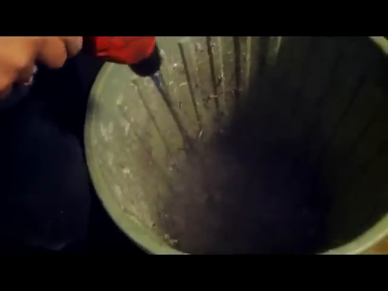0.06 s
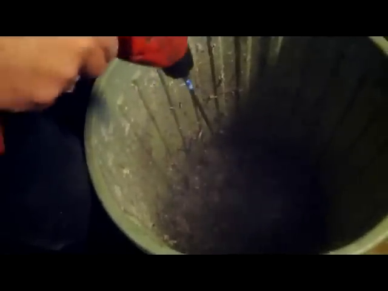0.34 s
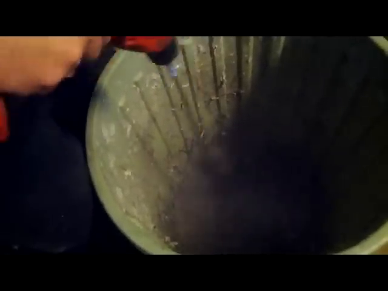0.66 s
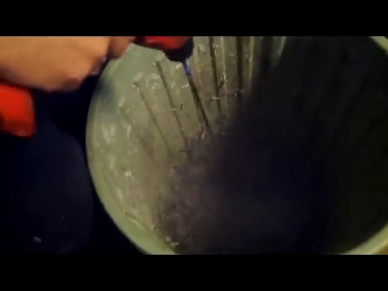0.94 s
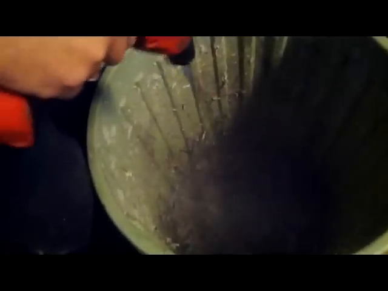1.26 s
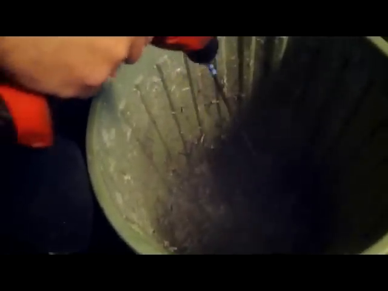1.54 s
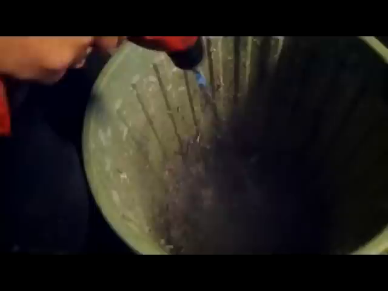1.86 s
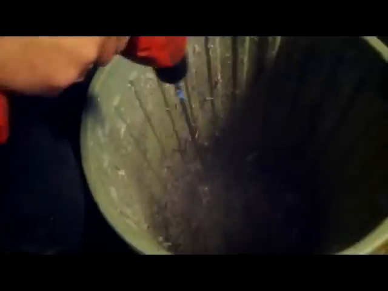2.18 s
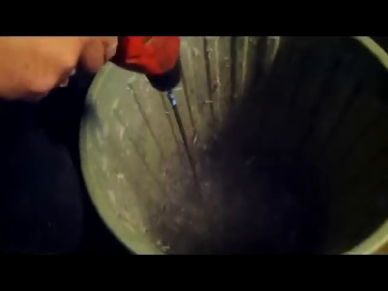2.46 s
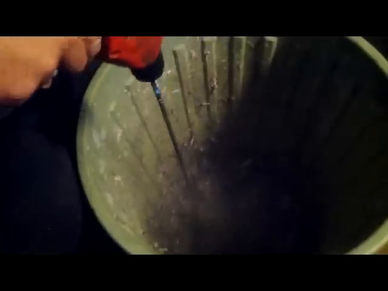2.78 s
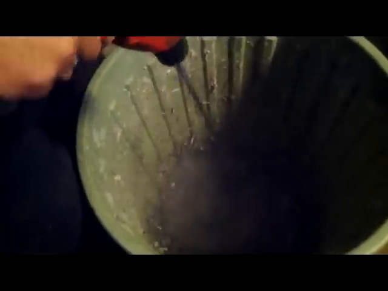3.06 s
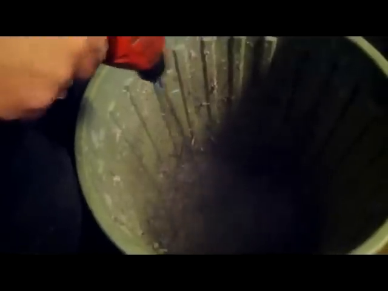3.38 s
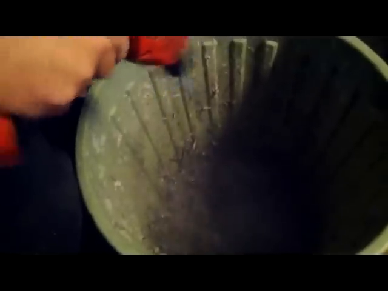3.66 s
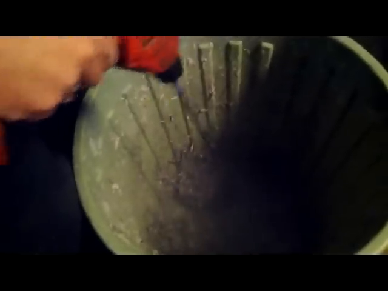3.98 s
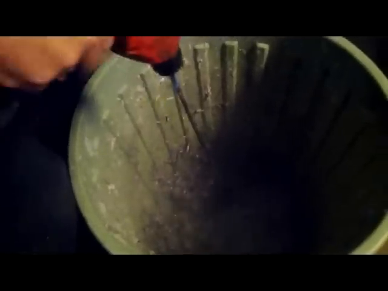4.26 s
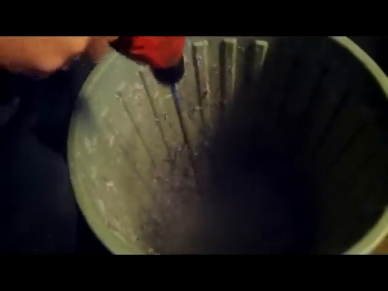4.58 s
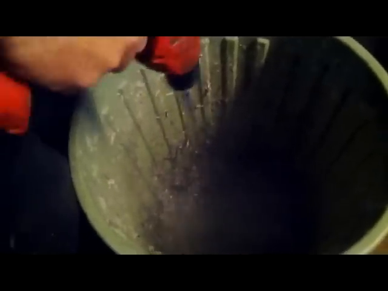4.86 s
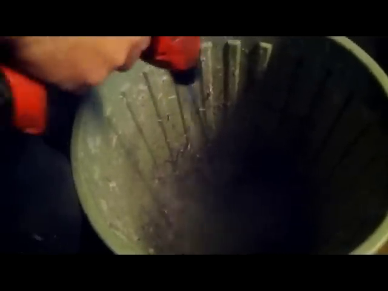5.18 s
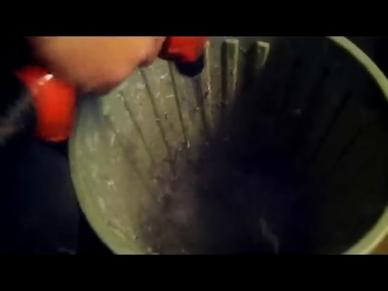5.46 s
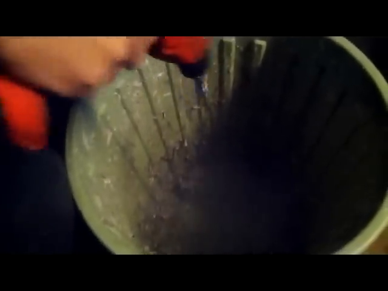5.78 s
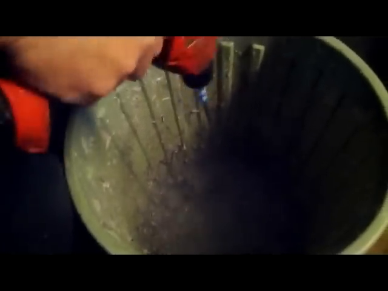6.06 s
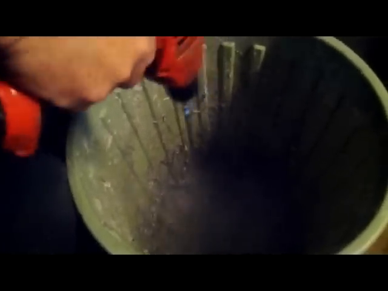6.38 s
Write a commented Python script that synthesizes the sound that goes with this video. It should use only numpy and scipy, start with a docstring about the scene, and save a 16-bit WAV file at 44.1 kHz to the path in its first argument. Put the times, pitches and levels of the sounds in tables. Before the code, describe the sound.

An electric drill stirs wet paper pulp in a plastic bucket, running in about eight uneven bursts. Its gears whine and rattle with a bright hiss, the pitch climbing, sagging and winding down at each release. The metal stirrer knocks and scrapes hollowly against the bucket while the pulp spatters and softly churns. A faint electrical hum fills the garage in the pauses. The close microphone overloads slightly.

```python
"""In a garage, an electric drill runs in bursts to stir wet paper pulp in a plastic bucket.
Its gears whine at the rate their teeth meet; tooth impacts and brush hiss ring the metal parts.
The stirrer knocks and scrapes along the bucket, exciting its modes, while the pulp spatters and churns.
Mains hum fills the pauses, and the loud bursts overload a nearby microphone."""
import sys
import numpy as np
from scipy import signal
from scipy.fft import rfft, irfft
from scipy.io import wavfile
from scipy.ndimage import uniform_filter1d

SR = 44100
rng = np.random.default_rng(int(sys.argv[2]) if len(sys.argv) > 2 else 0)


def persist_wave(psi):
    """Save psi, clipped to +-1, as 16-bit WAV."""
    counts = np.round(np.clip(psi, -1, 1) * 32767).astype(np.int16)
    wavfile.write(sys.argv[1], SR, np.atleast_2d(counts).T)


N = 292383
TIME = np.arange(N) / SR
PINION_TEETH, TEETH_PER_CHUCK_TURN, MAINS_HZ = 6, 48, 60

# One speed curve per trigger pull, from press to release. Each point: time in seconds, mesh rate in Hz.
TRIGGER_PULLS = [
    [(0.0, 1230), (0.035, 1504), (0.16, 1350), (0.235, 990)],
    [(0.5, 219.8), (0.557, 1007), (0.596, 1411), (0.65, 1711), (0.74, 1831), (0.776, 1535)],
    [(1.0, 298.3), (1.08, 1335), (1.11, 1307), (1.155, 990), (1.265, 796), (1.505, 576.2), (1.795, 1152),
     (1.863, 1258), (1.895, 1081)],
    [(2.12, 249.5), (2.225, 1528), (2.32, 1940), (2.435, 1378), (2.525, 861), (2.62, 1236), (2.668, 1054)],
    [(2.868, 298.9), (2.92, 1236), (2.96, 1502), (3.105, 1904), (3.245, 1522), (3.45, 906), (3.485, 1329),
     (3.545, 1529), (3.615, 1511), (3.745, 1717), (3.772, 1508)],
    [(4.315, 200), (4.45, 1054), (4.485, 1452), (4.58, 1959), (4.66, 1959), (4.74, 2149), (4.805, 1483),
     (4.885, 1257), (5.035, 1891), (5.12, 1953), (5.195, 1520), (5.325, 1376), (5.415, 850), (5.51, 630)],
    [(5.662, 279.5), (5.755, 1007), (5.87, 1056), (5.935, 623), (6.0, 847.6), (6.125, 876.7), (6.21, 1562),
     (6.279, 1424), (6.345, 952), (6.43, 574)],
    [(6.465, 597), (6.505, 994), (6.565, 1370), (6.63, 1349)],
]
# Spectrum of the brush hiss and the fine patter. Each row: frequency in Hz, relative level in dB.
HISS_SPECTRUM = [(3000, -19.5), (4800, -2), (5600, -2.5), (6700, -1), (8100, 2), (8700, 3), (9200, 4),
                 (9900, 0.5), (11300, 1), (13000, -1.5), (15800, -4.5)]


def drill(engage_hz=900, clean_drag=0.013, fan_lag_s=0.0097, clatter_s=0.018, coast_db_per_s=47):
    """Machine noise grows with speed; drag from the pulp modulates the frequency of the gear tones."""
    # Drag on the stirrer. Each row: time in seconds, speed wobble as a share of the speed.
    drag_curve = [(0, 0.013), (.2, .028), (.6, .01), (1.1, .012), (1.22, 0.031), (1.65, .032), (2.2, .007),
                  (2.45, .007), (3.0, .014), (3.6, .022), (3.78, 0.011), (4.38, 0.047), (4.56, .022),
                  (4.9, .015), (5.35, .024), (6.05, .04), (6.4, .027), (6.55, 0.0095)]
    # Slow drift of the treble. Each row: time in seconds, gain in dB.
    treble_drift = [(0, 1.5), (.55, -.5), (1.11, 2.5), (1.21, -4), (1.68, -1.5), (1.84, 1.5), (2.16, -0.5),
                    (2.53, -1.5), (2.64, -1), (3.3, 1.3), (3.75, 0.5), (4.4, 2.5), (4.7, 0.2), (5.4, 1.8),
                    (5.8, 2.5), (6.2, 0), (6.63, 2)]
    mesh_hz, coasting_s, mesh_db, octave_db, grip_db = motor()
    treble_db = np.interp(TIME, *np.transpose(treble_drift))
    drag = np.interp(TIME, *np.transpose(drag_curve))
    load = np.log2(drag / clean_drag)
    surge = np.tanh(np.gradient(np.log2(mesh_hz)) * SR / 13)  # saturates past 13 octaves a second
    # At each restart the gears clatter as they take up their play.
    clatter = sum(np.exp(-((TIME - pull[0][0]) / clatter_s - 1.5) ** 2) for pull in TRIGGER_PULLS[1:])
    fan_hz = np.minimum(mesh_hz, np.interp(TIME - fan_lag_s, TIME, mesh_hz))
    coast_db = coast_db_per_s * coasting_s  # unloaded teeth fall quiet
    whine_db = 3 + speed_gain_db(mesh_hz, knee_hz=857, db_per_octave=21) - 1.5 * load - coast_db
    rattle_db = -7.5 + speed_gain_db(mesh_hz, knee_hz=1490, db_per_octave=6) + grip_db - coast_db
    rattle_db += 0.5 * clatter + 0.23 * treble_db + 0.18 * load - 0.2 * surge
    hiss_db = -3.5 + speed_gain_db(fan_hz, knee_hz=1320, db_per_octave=15.5)
    hiss_db += treble_db + 0.3 * load + 0.6 * surge
    chuck_angle = 2 * np.pi * np.cumsum(mesh_hz) / SR / TEETH_PER_CHUCK_TURN
    wobble = 0.9 * np.sin(chuck_angle) + 0.4 * walk(35) + 0.75 * walk(80) + 0.9 * walk(600)
    teeth = np.cumsum(mesh_hz * (1 + drag * wobble)) / SR  # running count of tooth contacts
    buzz = overtones(teeth, drag) * np.minimum(mesh_hz / engage_hz, 1) ** 2  # slow gears only rattle
    gears = undb(rattle_db) * rattle(teeth, chuck_angle, buzz)
    tones = undb(whine_db) * whine(teeth, mesh_hz, mesh_db, octave_db, drag)
    return tones + gears + shaft_ring(gears) + undb(hiss_db) * hiss(teeth, buzz)


def motor(inertia_s=0.024):
    """Rotor inertia smooths changes of speed; after each release the speed decays exponentially."""
    # How the drill is held and loaded in each pull. Each row: gains in dB of the mesh tone,
    # its octave and the rattle, then the run-down time constant in seconds.
    grips = [(-3, 1.5, -1, .1), (1.5, 2.5, 1, .11), (-2, -0.5, 1, .115), (1, 0.5, -1, .11), (1, 0, 1, .12),
             (0.5, -0.5, 0, .14), (-.5, -3.5, 0, .17), (3, -2.5, 0.5, .11)]
    mesh_hz, coasting_s, offsets_db = np.zeros(N), np.zeros(N), np.zeros((3, N))
    for pull, (*grip_db, run_down_s) in zip(TRIGGER_PULLS, grips):
        times, hz = np.transpose(pull)
        now = TIME >= times[0]
        coasting_s[now] = np.maximum(TIME[now] - times[-1], 0)
        mesh_hz[now] = np.interp(TIME[now], times, hz) * np.exp(-coasting_s[now] / run_down_s)
        offsets_db[:, now] = np.array(grip_db)[:, None]
    return uniform_filter1d([mesh_hz, coasting_s, *offsets_db], int(inertia_s * SR), axis=1)


def whine(teeth, mesh_hz, mesh_db, octave_db, drag, slip_per_drag=13):
    """Forced vibration: the mesh tone and its octave swell as they sweep through housing resonances."""
    # Response of the housing. Each row: frequency in Hz, gain in dB.
    housing = [(300, -38), (620, -16), (800, -22.5), (980, -12.5), (1280, -10), (1500, -14.5), (1700, -18),
               (1920, -8.5), (2150, -18), (2600, -16), (2900, -8.5), (3150, -7.5), (3550, -4.5), (3850, -9),
               (4300, -15)]
    angle = 2 * np.pi * teeth
    phase = angle + slip_per_drag * drag * walk(300)  # slip under drag blurs the pitch
    swell_db = 2 * np.tanh(walk(22))  # the two tones see-saw slowly: as one gains, the other loses
    mesh_gain = undb(mesh_db + response(mesh_hz, housing) + swell_db)
    octave_gain = undb(octave_db - 1.5 + response(2 * mesh_hz, housing) - swell_db)
    mesh = mesh_gain * unit(undb(3.5 * walk(140))) * np.sin(phase)
    octave = octave_gain * unit(undb(4.5 * walk(140))) * np.sin(2 * phase)
    eccentricity = 1 + 0.17 * np.sin(angle / PINION_TEETH + walk(60))  # the pinion adds sidebands
    return np.sqrt(2) * (mesh + octave) * eccentricity


def rattle(teeth, chuck_angle, buzz, scatter_db=3, rub=0.65):
    """Impact excitation: uneven tooth blows ring the gearbox, harder once per rotor and chuck turn."""
    contacts = np.diff(np.floor(teeth), prepend=0)
    blows = unit(contacts * rng.standard_normal(N) * undb(scatter_db * rng.standard_normal(N)))
    force = blows + rub * rng.standard_normal(N) + undb(-8) * buzz
    rotor_angle = 2 * np.pi * teeth / PINION_TEETH
    load_db = 0.5 * np.sin(chuck_angle) + 0.5 * np.sin(rotor_angle) + 1.5 * walk(70)
    # Broad response of the gearbox. Each row: frequency in Hz, relative gain in dB.
    gearbox = [(120, -6.5), (450, -6.5), (750, -8), (1150, -3), (1400, -5), (1650, 0.5), (1950, -2),
               (2250, -3), (2700, -5), (3000, 1.5), (3500, -1), (4200, -2), (4900, -11), (6500, -22)]
    return unit(colour(metal(force * undb(load_db)), gearbox))


def hiss(teeth, buzz):
    """Amplitude modulation: brush and fan noise pulses with the mains current and the tooth contacts."""
    mains_angle = 2 * np.pi * MAINS_HZ * TIME
    spark_db = 0.7 * np.sin(2 * mains_angle) + np.sin(mains_angle)
    tooth_db = 5 * np.cos(2 * np.pi * teeth)
    force = rng.standard_normal(N) + undb(-11) * buzz
    flicker_db = 1.77 * walk(110)
    return unit(colour(metal(force * undb(spark_db + tooth_db + flicker_db)), HISS_SPECTRUM))


def overtones(teeth, drag, flutter_db=4, slip_per_drag=36):
    """Periodic tooth impacts form a harmonic series; slip under drag broadens each line."""
    # Each row: multiple of the mesh rate, relative level in dB.
    harmonics = [(3, -1.5), (4, -3), (5, -1), (6, -2), (7, -3), (8, -6)]
    eccentricity = 1 + 0.22 * np.sin(2 * np.pi * teeth / PINION_TEETH + walk(50))
    buzz = 0
    for multiple, db in harmonics:
        gain = undb(db + flutter_db * walk(70))
        buzz += gain * np.sin(2 * np.pi * multiple * teeth + slip_per_drag * drag * walk(260))
    return unit(eccentricity * buzz)


def metal(force):
    """Modal superposition: the damped ringing of gearbox and shaft adds to the direct force."""
    # Each row: frequency in Hz, time to decay 60 dB in seconds, gain in dB over the direct path.
    metal_modes = [(1540, 0.013, -34), (1940, 0.056, -3), (2840, 0.0075, -16.5), (3530, 0.0085, -6.5),
                   (5750, 0.036, -5), (6100, 0.034, -15), (8900, 0.027, -36), (9300, .012, -12),
                   (10700, .02, -23)]
    t, ring = TIME[:SR // 10], 0
    for hz, t60, db in metal_modes:
        decay = np.exp(-np.log(1000) * t / t60)
        ring += undb(db) * 2 * decay * np.cos(2 * np.pi * hz * t) / decay.sum()
    return force + signal.oaconvolve(force, ring)[:N]


def shaft_ring(drive, ring_hz=1680, width_hz=380, t60_s=0.7):
    """Free vibration: a cluster of lightly damped shaft modes sings on after the motor stops."""
    band = signal.iirpeak(ring_hz, ring_hz / width_hz, fs=SR)
    tail = signal.lfilter(*band, signal.lfilter(*band, noise_tail(t60_s)))
    return undb(-6) * signal.oaconvolve(drive, tail)[:N]


def bucket(bottom_top_hz=150, wall_top_hz=450, judder=0.07, detune=0.023, strike_s=0.0019, hard_s=0.011):
    """Impact and friction from the stirrer excite bucket modes, weighted by the height of contact."""
    # Each row: start in seconds, contact time in seconds, level in dB, height from bottom 0 to rim 1.
    knocks = [(0.218, 0.016, -15, 0.19), (.652, 0.0062, -12, 0.063), (0.715, 0.02, -14.5, 0.21),
              (.889, 0.01, -23.5, .02), (1.158, 0.0045, -6.5, 0.42), (1.257, 0.016, -16.5, .02),
              (1.301, 0.021, -11, 0.29), (1.461, 0.011, -18.5, 0.17), (1.902, 0.014, -11, 0.31),
              (1.987, 0.01, -15, 0.29), (2.247, 0.005, -5, 0.68), (2.607, .0044, -17, 0.52),
              (2.655, 0.02, -11.5, 0.83), (2.691, 0.029, -12.5, 1), (2.73, 0.041, -19, .85),
              (3.004, .015, -16.5, 0.22), (3.085, 0.011, -4.5, 0.43), (3.115, 0.018, -12.5, 0.29),
              (3.364, 0.009, -9.5, 0.67), (3.65, 0.013, -9.5, 0.46), (4.745, 0.025, -9.5, .35),
              (4.775, 0.024, -9, .15), (5.262, 0.026, -13, 0.061), (5.862, 0.04, -18.5, 0.29),
              (6.092, .012, -9.5, 0.52), (6.118, 0.021, -7, 1), (6.204, 0.015, -4.5, 0.77),
              (6.255, 0.033, -8, 0.99), (6.305, 0.028, -12.5, 0.93)]
    # Each row: frequency in Hz, time to decay 60 dB in seconds, relative level in dB.
    bucket_modes = [(89, 0.56, -8), (99.3, 0.35, 6.5), (118, 0.16, 7.5), (195, 0.33, -9.5),
                    (219.6, 0.17, -1), (276, 0.078, -2), (349, 0.039, -2), (404, 0.036, 0.5),
                    (510.4, 0.22, 6), (646, 0.032, 7), (760, .04, -5), (900, 0.067, 1)]
    # Bottom, wall and rim in turn. Each row: gain in dB when struck at the bottom, and at the rim.
    part_gains = [(4, -20), (-1, -1), (-25, -3)]
    out, t = np.zeros(N + SR), TIME[:SR // 3]
    hz, t60, db = np.transpose(bucket_modes)
    decays = undb(db)[:, None] * np.exp(-np.log(1000) * t / t60[:, None])
    part = np.searchsorted([bottom_top_hz, wall_top_hz], hz)
    radiation = signal.butter(4, 70, "high", fs=SR, output="sos")  # a small body radiates no deep bass
    for start_s, contact_s, level_db, height in knocks:
        # Long contacts are mostly judder, short ones mostly the first blow.
        age = t / (contact_s / 2)
        push = age * np.exp(-age) * judder * np.sqrt(contact_s / 0.0092) * rng.standard_normal(len(t))
        push[int(strike_s * SR)] += 1
        # Sloshing pulp shifts the lower modes; a short, hard contact favours the higher ones.
        shifted_hz = hz * (1 + detune * rng.standard_normal(len(hz)) * (hz < wall_top_hz))
        brightness = (hz / hz[0]) ** np.clip(hard_s / contact_s - 1, 0, 1.5)
        modes = brightness[:, None] * decays * np.sin(2 * np.pi * shifted_hz[:, None] * t)
        for k, part_db in enumerate(part_gains):
            vibration = signal.fftconvolve(push, modes[part == k].sum(axis=0))[:len(t)]
            ring = signal.sosfilt(radiation, vibration)
            gain = undb(level_db + np.interp(height, [0, 1], part_db))
            out[int(start_s * SR):][:len(t)] += gain * ring / np.std(ring[:SR // 20])
    return out[:N]


def spatter(tail_s=0.029, drops_per_s=45, drop_decay_s=0.0017):
    """Brief impacts have broad spectra: sharp ticks, some from the trigger as a pull begins and some wet, over
    a fine random patter of pulp on the wall."""
    # Each row: start in seconds, peak level in dB, decay time constant in seconds.
    flicks = [(.37, -21, .002), (.423, -26, .003), (.439, -27, 0.0031), (.453, -21, .003),
              (.469, -9, .0025), (.885, 3, .007), (1.146, 6, 0.009), (1.19, 3, .009), (1.248, 1.5, 0.0098),
              (1.306, -6, .006), (1.343, 1, 0.0081), (1.456, -1.5, .0082), (2.876, -7, 0.0034),
              (3.936, -11, 0.0035), (4.003, -15.5, .002), (4.038, -23, 0.0013), (4.07, -21, .0015),
              (4.271, -11, 0.0027), (4.286, -8, 0.0021), (4.319, -14, 0.0066), (4.336, -9.5, 0.0086),
              (4.355, -5, 0.009), (5.668, -13, 0.0052)]
    # Each row: frequency in Hz, relative level in dB.
    flick_spectrum = [(200, -29), (800, -1), (1600, -5), (2500, -4.5), (3700, -0.5), (5500, -13.5),
                      (8500, -2.5), (12000, -5), (16000, -18)]
    out, t = np.zeros(N + SR), TIME[:SR // 10]
    for start_s, db, decay_s in flicks:
        envelope = np.exp(-t / decay_s) + 0.14 * np.exp(-t / tail_s)
        tick = colour(rng.standard_normal(len(t)) * envelope, flick_spectrum)
        out[int(start_s * SR):][:len(t)] += tick * undb(db) / np.abs(tick).max()
    drops = (rng.random(N) < drops_per_s / SR) * rng.random(N)
    patter = signal.fftconvolve(drops, np.exp(-t / drop_decay_s))[:N] * rng.standard_normal(N)
    return out[:N] + undb(-46) * unit(colour(patter, HISS_SPECTRUM))


def churn(settle_s=0.11, lumpy_db=1.5, full_swirl_db=-27):
    """Flow noise: the pulp squelches unevenly, its swirl following the motor with a first-order lag."""
    # Each row: frequency in Hz, relative level in dB.
    pulp_spectrum = [(60, -16), (150, -4), (350, 0), (700, -4.5), (1500, -8), (5000, -25), (9000, -13),
                     (16000, -39)]
    pole = np.exp(-1 / (settle_s * SR))
    swirl = signal.lfilter([1 - pole], [1, -pole], motor()[0])
    squelch = rng.standard_normal(N) * undb(lumpy_db * walk(60))
    return undb(full_swirl_db) * swirl / swirl.max() * unit(colour(squelch, pulp_spectrum))


def room(x, t60_s=0.12, wet_db=-14):
    """Reverberation: short, dense reflections from the bucket and garage walls join the direct sound."""
    return x + undb(wet_db) * signal.fftconvolve(x, noise_tail(t60_s))[:N]


def garage(rumble_db=-41):
    """A line spectrum over a continuous one: mains hum and faint steady tones above a low rumble."""
    # Each row: frequency in Hz, rms level in dB.
    hum_tones = [(59.6, -36), (119.2, -57.5), (463, -60), (517, -80)]
    # Each row: frequency in Hz, relative level in dB.
    rumble_spectrum = [(20, -35), (40, -28), (100, 7), (250, -6.5), (500, -4.5), (1000, -31), (4000, -13),
                       (16000, -12)]
    hum = sum(undb(db) * np.sin(2 * np.pi * (hz * TIME + rng.random())) for hz, db in hum_tones)
    return np.sqrt(2) * hum + undb(rumble_db) * unit(colour(rng.standard_normal(N), rumble_spectrum))


def speed_gain_db(hz, knee_hz, db_per_octave):
    """Power law: the level falls with speed below a soft knee and nears 0 dB above it."""
    return -db_per_octave * np.log2(1 + (knee_hz / hz) ** 4) / 4


def noise_tail(t60_s):
    """Dense modes or echoes sum to exponentially decaying noise, here of unit energy."""
    t = TIME[:SR // 2]
    tail = rng.standard_normal(len(t)) * np.exp(-np.log(1000) * t / t60_s)
    return tail / np.linalg.norm(tail)


def colour(x, spectrum, size=4096):
    """Minimum-phase filter with a (Hz, dB) response, made by folding the cepstrum."""
    cepstrum = irfft(np.log(undb(response(np.fft.rfftfreq(size, 1 / SR), spectrum))))
    cepstrum[1:size // 2] *= 2
    cepstrum[size // 2 + 1:] = 0
    return signal.fftconvolve(x, irfft(np.exp(rfft(cepstrum))))[:len(x)]


def response(hz, spectrum):
    """Gain in dB from a (Hz, dB) table, interpolated over log frequency."""
    points_hz, db = np.transpose(spectrum)
    return np.interp(np.log(hz + 1), np.log(points_hz), db)


def walk(rate):
    """Smooth random fluctuation of rms 1 that changes about rate times a second."""
    hold = int(SR / rate)
    steps = rng.standard_normal(N)[np.arange(N) // hold]
    return unit(uniform_filter1d(steps, hold))


def undb(db):
    """Decibels to amplitude gain."""
    return 10 ** (np.asarray(db) / 20)


def unit(x):
    """Scale to rms 1."""
    return x / np.sqrt(np.mean(x ** 2) + 1e-18)


def scene():
    """Superposition: all sources add at one point, the same in both channels."""
    mono = room(drill() + churn() + spatter()) + bucket() + garage()
    return np.array([mono, mono])


def record(dry, ceiling=0.69, knee=6, top_hz=15800):
    """Saturation: the overloaded microphone flattens the peaks; a low-pass then cuts the top."""
    oversampled = signal.resample_poly(dry, 2, 1, axis=1)
    clipped = oversampled / (1 + np.abs(oversampled / ceiling) ** knee) ** (1 / knee)
    lowpass = signal.ellip(10, 0.1, 60, top_hz, fs=SR, output="sos")
    return signal.sosfiltfilt(lowpass, signal.resample_poly(clipped, 1, 2, axis=1))


dry = scene()
out = record(dry)
persist_wave(out)
```